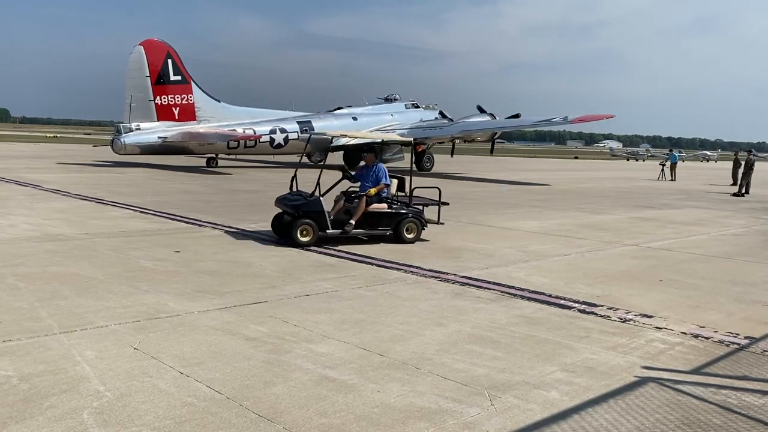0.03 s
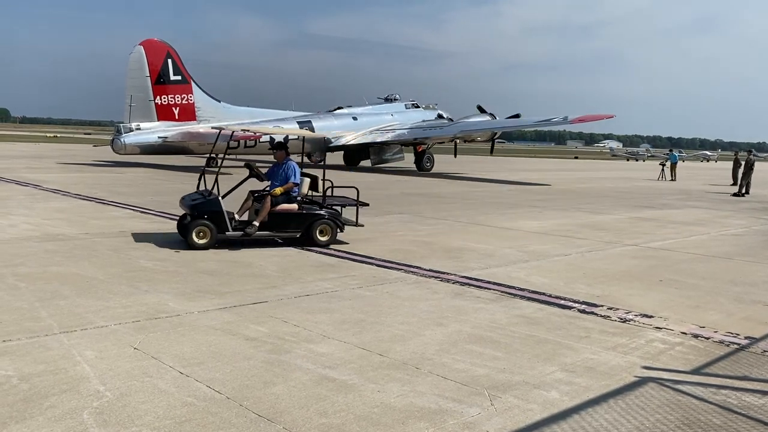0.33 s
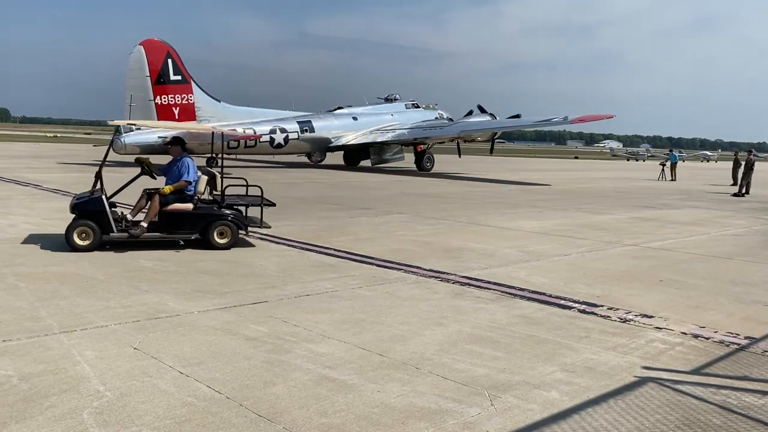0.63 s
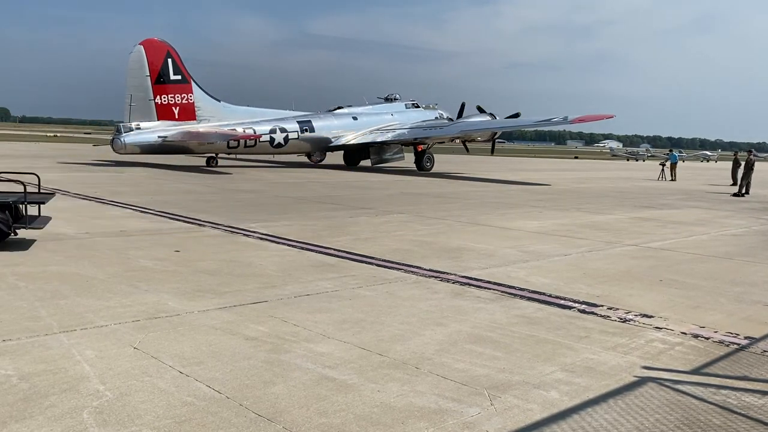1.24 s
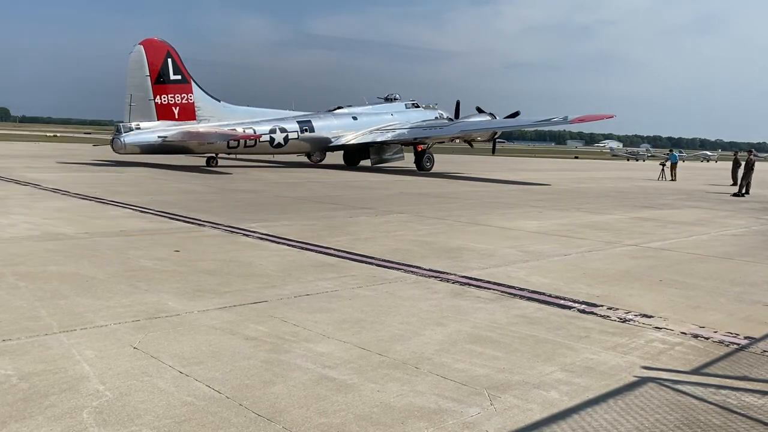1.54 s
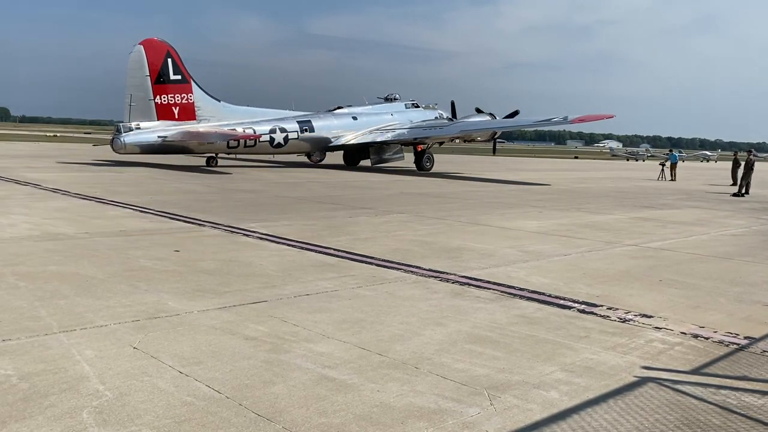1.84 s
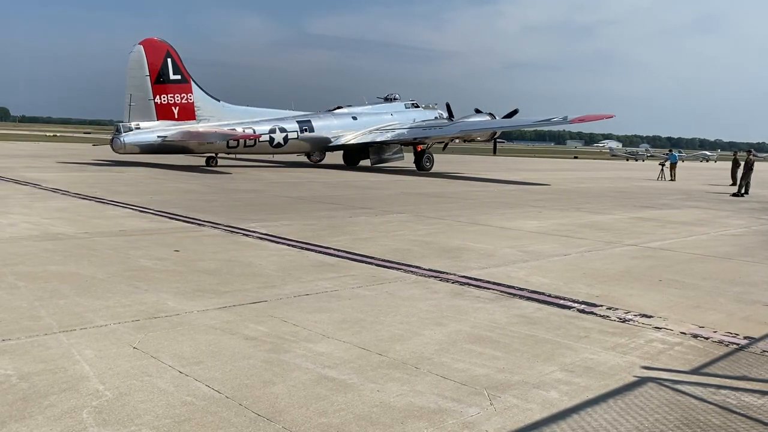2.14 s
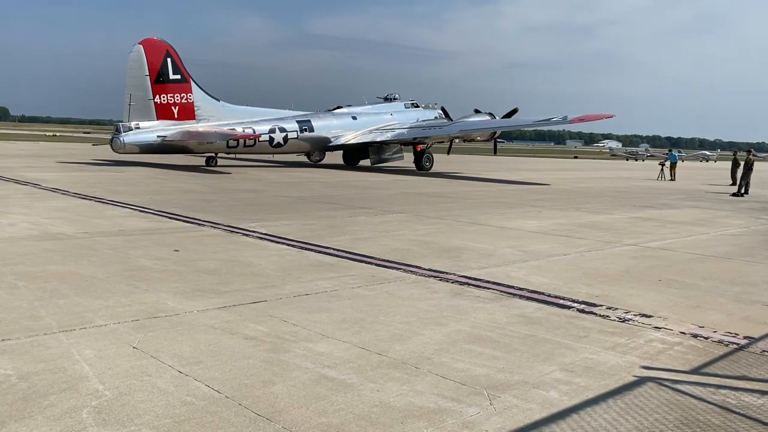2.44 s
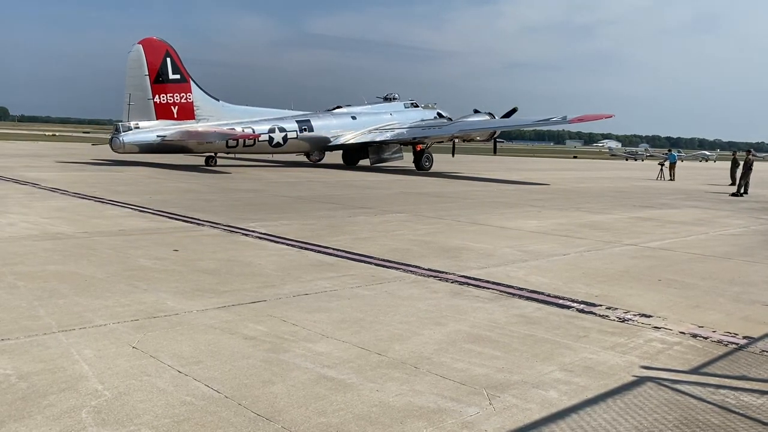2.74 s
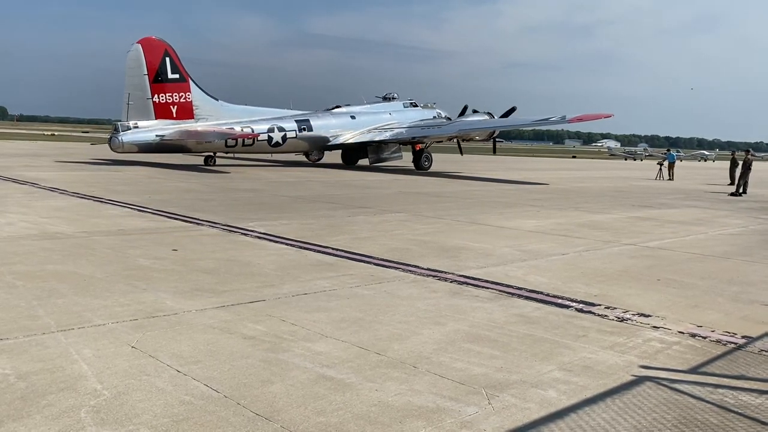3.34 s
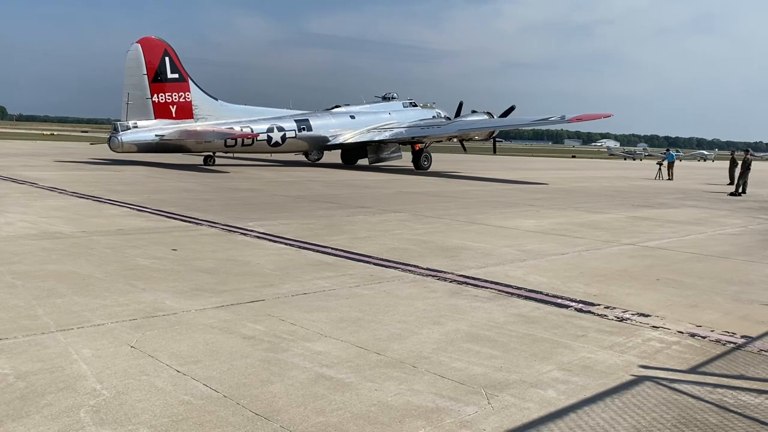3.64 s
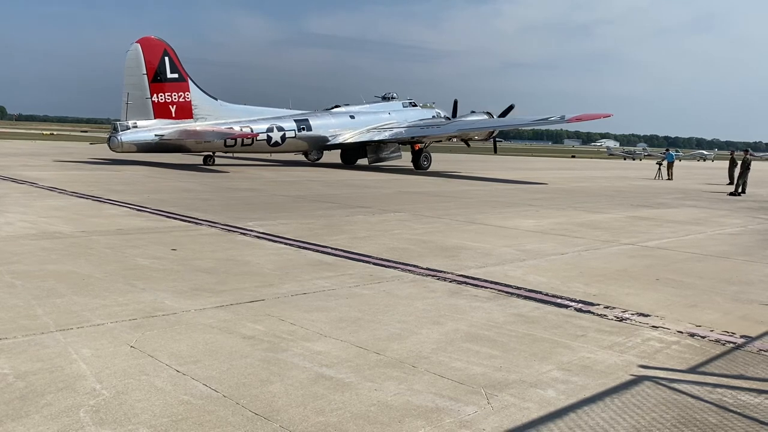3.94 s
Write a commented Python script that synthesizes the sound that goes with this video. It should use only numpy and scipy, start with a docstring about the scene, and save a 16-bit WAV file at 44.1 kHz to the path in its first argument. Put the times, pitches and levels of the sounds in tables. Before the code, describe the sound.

Piston aircraft engines rumble and throb at idle, with chopping propellers and occasional exhaust pops.

```python
"""An uneven, throbbing idle with a fast chop: a four-engined piston aircraft tens of metres away.
Each nine-cylinder radial fires unevenly into its exhaust; two run at nearly the same speed and beat
against each other, with an odd heavy chug or bark. A propeller chops the air once a blade, over the
rush of its wash and a rough, surging low engine rumble."""
import sys
import numpy as np
from scipy import signal
from scipy.fft import rfft, irfft
from scipy.io import wavfile
from scipy.ndimage import uniform_filter1d

SR = 44100
rng = np.random.default_rng(int(sys.argv[2]) if len(sys.argv) > 2 else 0)


def transcribe(signal):
    """Save signal, clipped to [-1, 1], as a 16-bit WAV file at the path in sys.argv[1]."""
    frames = np.atleast_2d(signal).T
    limited = np.clip(frames, -1, 1)
    pcm = np.round(limited * 32767).astype(np.int16)
    wavfile.write(sys.argv[1], SR, pcm)


N = 176400
TIME_S = np.arange(N) / SR
BIN_HZ = np.arange(N // 2 + 1) * SR / N
SIDES = np.array([[1], [-1]])  # left, right

# cylinders in firing order (strength [dB], delay through the exhaust ring [ms])
CYLINDERS = [(-0.5, 0.11), (-0.5, 1.295), (-1.5, 2.24), (-8.5, 0.81), (1.5, 2.604), (-1, 0.43), (1.5, 1.76),
             (-8.5, 0.18), (-8, 1.15)]
# blade passes (time [s], rate [Hz])
BLADE_RATE_HZ = [(0, 36.75), (.8, 36.75), (1.15, 36.25), (1.6, 36.9), (2.2, 36.3), (2.85, 36.9),
                 (3.3, 36.35), (3.55, 36.5), (3.75, 35.6), (4, 36.4)]
# spectrum of blade chop and bark crack (frequency [Hz], density [dB])
CHOP_SPECTRUM = [(500, -71), (900, -56.5), (1300, -58.5), (1700, -61.5), (2000, -62.5), (2700, -66),
                 (3400, -69), (4200, -74), (4700, -78.5), (7000, -80.5), (8500, -86.5), (10700, -84.5),
                 (12000, -88.5), (13000, -104)]


def undb(db):
    """Decibels to gain."""
    return 10 ** (np.asarray(db) / 20)


def unit_rms(x):
    """Scale to unit rms."""
    return x / np.sqrt(np.mean(x ** 2))


def over_time(rows):
    """Interpolate (time [s], value) rows per sample."""
    return np.interp(TIME_S, *np.array(rows).T)


def over_hz(rows):
    """Interpolate (frequency [Hz], value) rows per bin, on a log axis."""
    hz, value = np.array(rows).T
    return np.interp(np.log(BIN_HZ + 1), np.log(hz), value)


def colour(x, spectrum):
    """Filter that gives unit white noise the listed density."""
    return irfft(rfft(x) * undb(over_hz(spectrum)) * np.sqrt(SR / 2), N)


def walk(rate_hz):
    """Random steps, smoothed twice, unit rms."""
    hold = max(int(SR / rate_hz), 1)
    steps = np.repeat(rng.standard_normal(N // hold + 1), hold)
    return unit_rms(uniform_filter1d(uniform_filter1d(steps, hold), hold)[:N])


def swell(peak_s, rise_s, decay_s):
    """Gaussian rise, exponential decay."""
    age_s = TIME_S - peak_s
    return np.exp(-(np.minimum(age_s, 0) / rise_s) ** 2 - np.maximum(age_s, 0) / decay_s)


def harmonics(cycles, rows, waver_hz, waver_db=.3):
    """Wavering sines from (order, rms level [dB]) rows."""
    out = np.zeros(N)
    for order, db in rows:
        peak = np.sqrt(2) * undb(db + waver_db * walk(waver_hz))
        out += peak * np.sin(2 * np.pi * (order * cycles + rng.random()))
    return out


def rumble():
    """Rough, surging low engine rumble."""
    # (frequency [Hz], density [dB])
    spectrum = [(15, -72), (30, -59), (45, -55), (60, -46.5), (76, -42), (110, -46), (130, -46),
                (155, -47.5), (185, -46.5), (230, -47.5), (330, -53.5), (600, -58.5), (1500, -112),
                (4000, -120)]
    # (time [s], gain [dB])
    surge_db = [(0, 2.5), (.3, 1.5), (.45, 4), (.65, 4), (.92, 2), (1.2, 3), (1.32, 2), (1.56, 0),
                (1.68, -0.5), (1.85, 3.5), (2.1, -1), (2.42, 2), (2.62, -1.5), (2.85, 3.5), (3.2, 2.5),
                (3.32, -3), (3.52, 4), (3.6, 8.5), (3.69, 2), (3.82, 3), (4, 0)]
    return colour(rng.standard_normal(N), spectrum) * undb(over_time(surge_db))


def wash(flicker_db=.45):
    """Flickering rush of air behind the propellers."""
    # (frequency [Hz], density [dB])
    spectrum = [(20, -90), (200, -51.5), (500, -52.5), (800, -55.5), (1300, -59.5), (1800, -64),
                (2700, -67.5), (4100, -71), (4700, -74.5), (5500, -74), (6400, -77.5), (7800, -78),
                (8400, -82.5), (9500, -81), (10700, -80), (12000, -84.5), (12700, -89.5), (15500, -91.5)]
    # (time [s], gain [dB])
    gain_db = [(0, -1.5), (.8, 0), (1.3, -1), (1.9, 1.5), (2.7, 1.6), (3.3, 0.4), (4, 1.5)]
    return colour(rng.standard_normal(N), spectrum) * undb(over_time(gain_db) + flicker_db * walk(70))


def blade_tones():
    """Blades push the air in step: a few low tones."""
    # (multiple of blade rate, level [dB])
    tones = [(2, -33), (3, -33.5), (4, -29.5), (5, -32.5), (6, -33), (8, -39)]
    passes = np.cumsum(over_time(BLADE_RATE_HZ)) / SR
    return harmonics(passes, tones, waver_hz=3.7)


def blade_gate(lag_s, decay_s, attack_s=.0052, first_pass_s=-.0027, scatter_db=.9):
    """Quick swell and fall per blade pass, each of random strength."""
    rate_hz = over_time(BLADE_RATE_HZ)
    passes = np.cumsum(rate_hz) / SR - (first_pass_s + lag_s) * rate_hz[0] + 2
    strength = undb(scatter_db * rng.standard_normal(N // 500))
    blade = passes.astype(int)
    age_s = passes % 1 / rate_hz
    pulse = lambda s: (1 - np.exp(-(s / attack_s) ** 2)) * np.exp(-s / decay_s)
    previous_tail = strength[blade - 1] * pulse(age_s + 1 / rate_hz)
    return unit_rms(strength[blade] * pulse(age_s) + previous_tail)


def propeller(grit_db=1.1):
    """Each blade tears off a gritty burst of air, dulled by distance; a lower thud follows."""
    # (time [s], gain [dB])
    chop_db = [(0, -2), (.3, -2), (.62, -1), (.82, 1), (1.05, -4), (1.4, -0.5), (1.65, -1), (1.9, 0.7),
               (2.2, 1.5), (2.55, 2.5), (2.8, 0.5), (3.05, -1), (3.35, 0.5), (3.7, -2), (4, -3.5)]
    thud_db = [(0, 2.5), (.45, 2.5), (.7, -0.5), (1, 2.5), (1.5, 2), (1.85, .5), (2.05, -5.5), (2.4, -3),
               (2.9, -2.5), (3.2, -2.5), (3.6, -2), (4, -1.5)]
    # (time [s], lag behind the chop [s])
    thud_lag_s = [(0, 0.0015), (1.8, 0.0052), (2.3, 0.012), (3.3, 0.0075), (3.7, 0.0036), (4, 0.0026)]
    # (frequency [Hz], density [dB])
    thud_spectrum = [(60, -57), (200, -68.5), (400, -48.5), (560, -54), (780, -55), (1100, -61.5),
                     (2000, -89), (4500, -93), (9000, -120)]
    grit = unit_rms(rng.standard_normal(N) * undb(grit_db * walk(900)))
    chop = colour(grit * blade_gate(lag_s=0, decay_s=.0072), CHOP_SPECTRUM)
    puffs = rng.standard_normal(N) * blade_gate(over_time(thud_lag_s), decay_s=.012)
    thud = colour(puffs, thud_spectrum)
    return chop * undb(over_time(chop_db)) + thud * undb(over_time(thud_db))


def barks():
    """Single hard pops of exhaust gas: hollow body, bright crack."""
    # (time [s], body [dB], crack [dB])
    pops = [(.117, -16.5, -27), (.19, -20, -33), (.523, -24, -25), (.657, -19, -22), (.849, -17.5, -23),
            (1.016, -13.5, -33), (1.042, -16.5, -24), (1.153, -16, -24), (1.344, -17, -24),
            (1.856, -19.5, -22), (2.161, -19, -18.5), (2.198, -14, -31), (2.458, -29, -18.5),
            (2.611, -19, -31), (2.87, -15.5, -18.5), (3.155, -14.5, -32)]
    # (frequency [Hz], relative density [dB])
    body_spectrum = [(200, -40), (450, -12), (560, 1.5), (660, -4.5), (800, -4), (1100, -9.5), (1600, -27),
                     (4000, -60)]
    body = unit_rms(colour(rng.standard_normal(N), body_spectrum))
    crack = unit_rms(colour(rng.standard_normal(N), CHOP_SPECTRUM))
    return sum(swell(at_s, rise_s=.0023, decay_s=.006) * (undb(body_db) * body + undb(crack_db) * crack)
               for at_s, body_db, crack_db in pops)


def chugs():
    """Odd heavy firings, each dying in a cycle or two of the exhaust pipe."""
    # (time [s], peak [dB], pitch [Hz])
    firings = [(.059, -7.5, 129), (0.351, -8.5, 112), (0.624, -3, 110), (0.7, -8.5, 150), (1.283, -8, 99),
               (1.439, -9, 124), (1.533, -6.5, 109), (1.851, -6.5, 72), (2.378, -9, 130), (3.22, -7, 128),
               (3.302, -8, 130), (3.598, -11, 122), (3.63, -7, 144), (3.722, -10, 129), (3.785, -9, 90),
               (3.819, -7.5, 129)]
    out = np.zeros(N)
    for at_s, db, hz in firings:
        pipe = np.cos(2 * np.pi * hz * (TIME_S - at_s))
        out -= undb(db) * swell(at_s, rise_s=.005, decay_s=.0054) * pipe
    return out


def drone(cycles, trim_db=-1.5):
    """Tones locked to the four-stroke cycle."""
    # (multiple of cycle rate, relative level [dB])
    tones = [(7, -34), (14, -33), (16, -25), (17, -35), (20, -37), (24, -35), (25, -33), (28, -35),
             (30, -32.5), (33, -34), (35, -33), (38, -37)]
    return undb(trim_db) * harmonics(cycles, tones, waver_hz=3.16)


def airframe_echoes(x, decay_s=.021, above_hz=120, echo_db=2):
    """Add reflections off wing, fuselage and concrete; long waves pass by."""
    spray = rng.standard_normal(N) * np.exp(-TIME_S / decay_s)
    echoes = undb(echo_db) * rfft(spray / np.linalg.norm(spray))
    ratio = (BIN_HZ / above_hz) ** 6
    high_pass = np.sqrt(ratio / (1 + ratio))
    return irfft(rfft(x) * (1 + echoes * high_pass), N)


def exhaust(cycles, jitter_ms=.28, scatter_db=3):
    """One pulse per cylinder per cycle, uneven in strength and timing."""
    # (frequency [Hz], relative gain [dB])
    pipe_response = [(25, -34), (42, -27), (60, 23), (80, -11), (98, 3), (125, -21), (165, 0), (210, -10.5),
                     (290, 7.5), (380, -1.5), (480, -4.5), (800, -11.5), (1500, -18), (4000, -31.5),
                     (12000, -70)]
    firings = cycles * len(CYLINDERS)
    index = np.arange(np.ceil(firings[0]), firings[-1]).astype(int)
    strength_db, delay_ms = np.array(CYLINDERS)[index % len(CYLINDERS)].T
    jitter, scatter = rng.standard_normal((N // 200, 2))[:len(index)].T
    offset_ms = delay_ms - delay_ms.mean() + jitter_ms * jitter
    at_sample = np.interp(index, firings, np.arange(N)) + offset_ms * SR / 1000
    pulses = np.bincount(at_sample.astype(int) % N, undb(strength_db + scatter_db * scatter), N)
    return unit_rms(colour(airframe_echoes(pulses - pulses.mean()), pipe_response))


def engines(speed_wander=.0009, exhaust_trim_db=-1.95):
    """Four radials at wandering speeds: exhaust, firing-rate hum, chugs; the nearest also drones."""
    # (crank speed [rpm], relative exhaust level [dB], start phase [cycles])
    radials = [(1302, -24, 0.0), (1285.4, -27, 0.076), (1174, -27, 0.4), (1464, -27.5, 0.7)]
    # per engine (relative hum level [dB])
    hums_db = [-26, -30, -33, -35]
    # (time [s], gain [dB])
    exhaust_gain_db = [(0, -4.5), (.25, -1), (.5, -0.5), (.7, 1), (1.1, .5), (1.5, -1), (1.68, 1.5),
                       (1.9, 0), (2.4, -0.5), (2.6, -0.5), (2.9, -.5), (3.5, 1.5), (4, -1)]
    hum_gain_db = [(0, 3), (.55, 0), (.92, -5), (1.15, -3), (1.32, 1.5), (1.56, 3), (1.68, 1.5), (2.05, -1),
                   (2.45, 4.5), (2.62, -12), (2.8, 0), (3.1, 1.5), (3.4, -2), (3.8, -0.5), (4, -1)]
    crank_hz = [rpm / 60 * (1 + speed_wander * walk(5)) for rpm, _, _ in radials]
    engine_cycles = np.cumsum(crank_hz, axis=1) / SR / 2  # two crank turns per cycle
    out = drone(engine_cycles[0]) + chugs()
    for cycles, (_, exhaust_db, start), hum_db in zip(engine_cycles, radials, hums_db):
        out += undb(exhaust_db + exhaust_trim_db + over_time(exhaust_gain_db)) * exhaust(cycles + start)
        hum = unit_rms(np.cos(2 * np.pi * len(CYLINDERS) * (cycles + start)))
        out += undb(hum_db + over_time(hum_gain_db)) * hum
    return out


def scene(diffuse_s=.03):
    """Aircraft ahead, plus a diffuse share that differs between left and right."""
    # (frequency [Hz], unshared power [fraction])
    unshared = [(100, .075), (600, .11), (1500, .1), (3000, .14), (4500, .3), (8000, .18), (15000, .18)]
    motors = engines() + blade_tones()
    direct = rfft(motors + propeller() + wash() + rumble() + barks())
    spray = rng.standard_normal(N) * np.exp(-TIME_S / diffuse_s)
    smear = np.exp(1j * np.angle(rfft(spray)))
    diffuse = rfft(motors) * smear + rfft(propeller() + wash() + rumble())
    side_share = over_hz(unshared) / 2
    return irfft(direct * np.sqrt(1 - side_share) + SIDES * diffuse * np.sqrt(side_share), N)


def record(dry, low_cut_hz=33, top_hz=15800):
    """Two microphone ports, each with its own colour and lag; fixed peaks and dips; band-limited."""
    # tone colour, with a deep notch near 8.5 kHz (centre [Hz], width [Hz], gain [dB])
    peaks_and_dips = [(478, 28, -2.5), (545, 33, 1), (606, 35, -2), (755, 36, 1), (850, 122, 1.5),
                      (1002, 61, -2.7), (1526, 107, 3.5), (1770, 90, 0), (2012, 70, 5.5), (2350, 36, 3),
                      (4120, 49, -5.5), (4170, 100, 3), (4500, 180, -2.5), (4880, 120, 2), (5510, 93, -8),
                      (6350, 134, 7), (6514, 120, -9), (6710, 140, 3.5), (8470, 285, -18.5)]
    mid_dip = (2230, 169, -8.5)
    # (frequency [Hz], left minus right [dB])
    balance_db = [(100, -1.3), (330, -1.7), (500, 1), (650, -1), (820, 1.5), (1020, -2), (1260, 4),
                  (1450, -1), (1620, 1), (1900, -3), (2280, -7), (3200, 0), (4300, 6), (5500, 1),
                  (7000, -1), (9000, 0)]
    # (frequency [Hz], left lead [rad])
    lead_rad = [(100, -.15), (430, .15), (750, -.15), (1100, -.5), (1650, -1.6), (2150, -1.2), (2300, .5),
                (3000, 1.2), (4400, .7), (5300, -1.2), (6000, -1.7), (7000, -.6), (8200, -2.8),
                (9000, -2.2), (10500, -.5), (11700, -.7), (12700, -2.6), (14200, -2.6), (15500, -.8)]
    ports = undb(SIDES * over_hz(balance_db) / 2) * np.exp(1j * SIDES * over_hz(lead_rad) / 2)
    tone_db = sum(db * np.exp(-((BIN_HZ - centre_hz) / width_hz) ** 2)
                  for centre_hz, width_hz, db in [mid_dip, *peaks_and_dips])
    heard = irfft(rfft(dry) * ports * undb(tone_db), N)
    heard = signal.sosfilt(signal.butter(4, low_cut_hz, "high", fs=SR, output="sos"), heard)
    return signal.sosfilt(signal.ellip(8, .2, 70, top_hz, fs=SR, output="sos"), heard)


dry = scene()
out = record(dry)
transcribe(out)
```